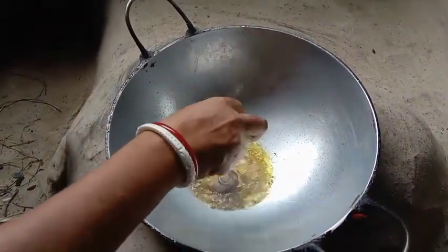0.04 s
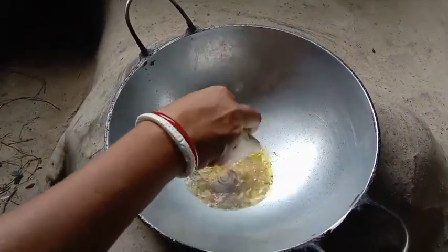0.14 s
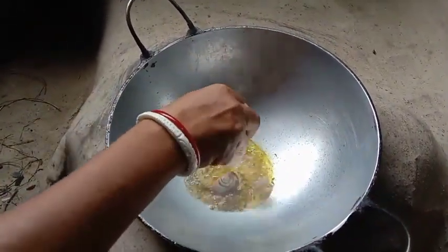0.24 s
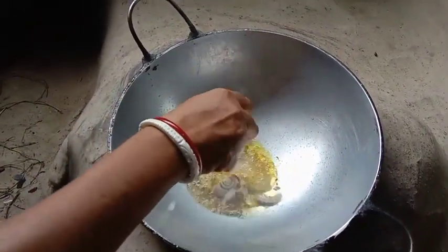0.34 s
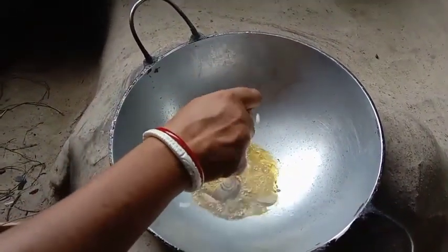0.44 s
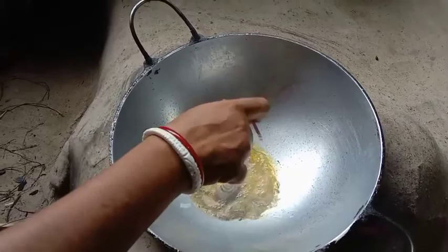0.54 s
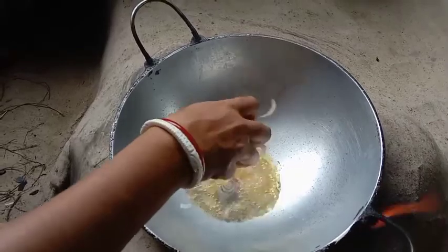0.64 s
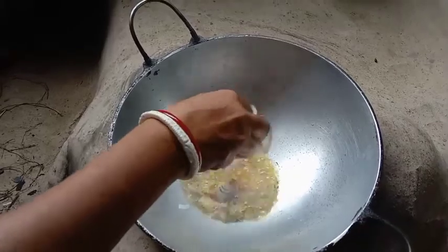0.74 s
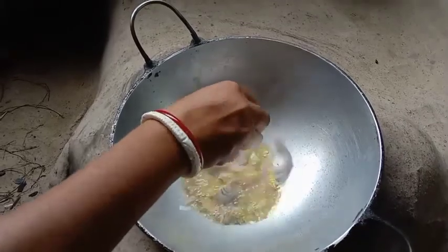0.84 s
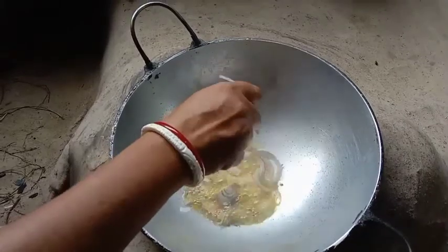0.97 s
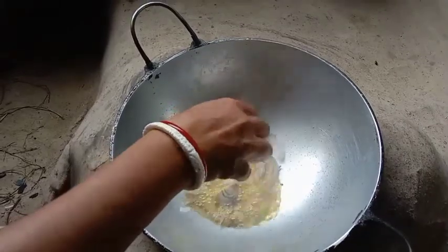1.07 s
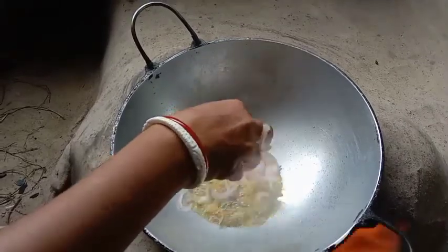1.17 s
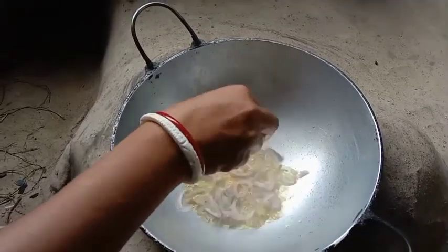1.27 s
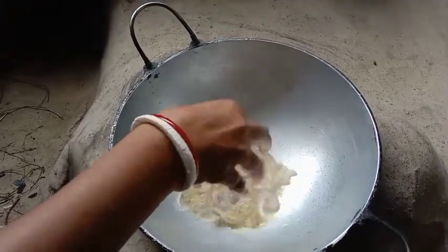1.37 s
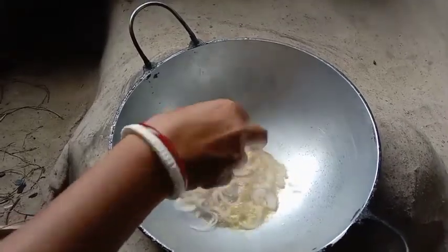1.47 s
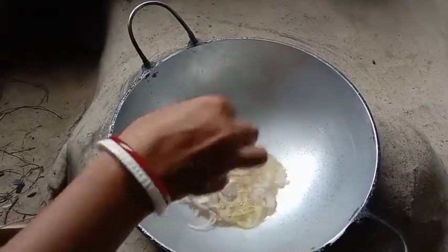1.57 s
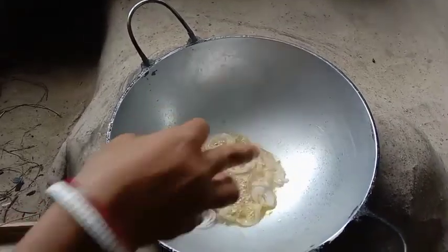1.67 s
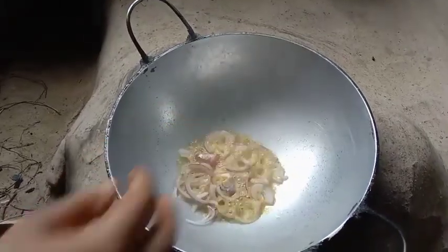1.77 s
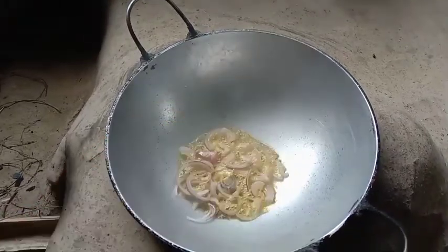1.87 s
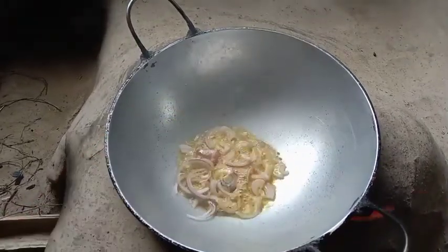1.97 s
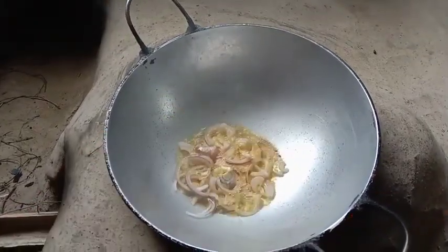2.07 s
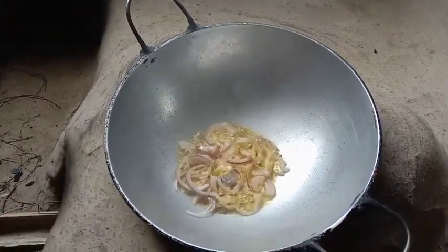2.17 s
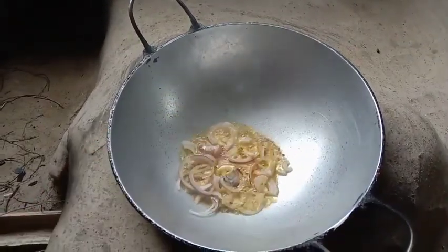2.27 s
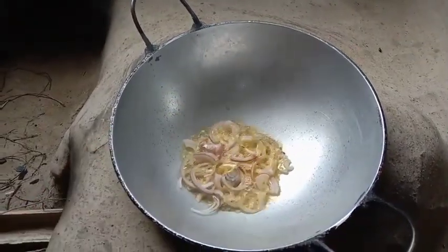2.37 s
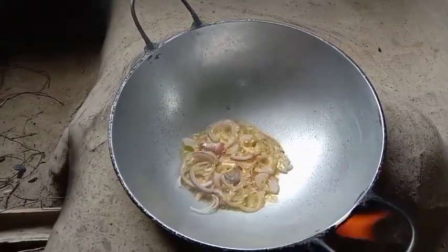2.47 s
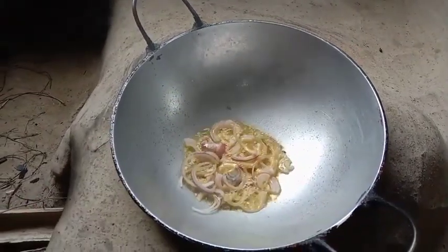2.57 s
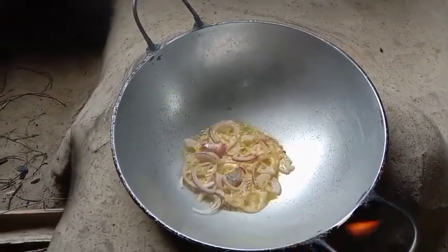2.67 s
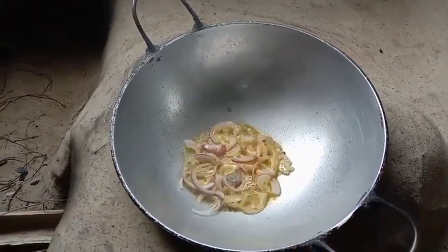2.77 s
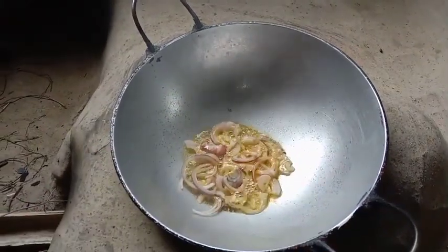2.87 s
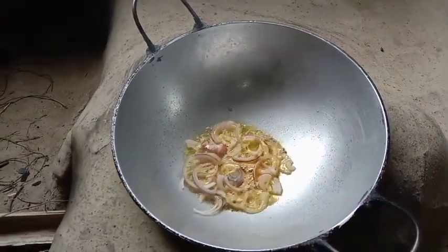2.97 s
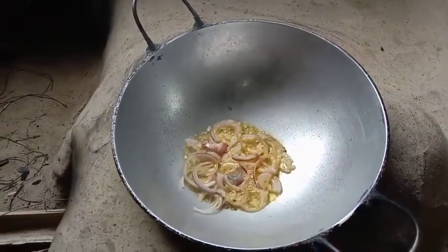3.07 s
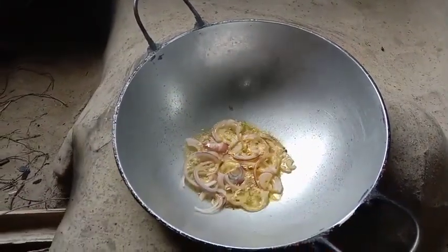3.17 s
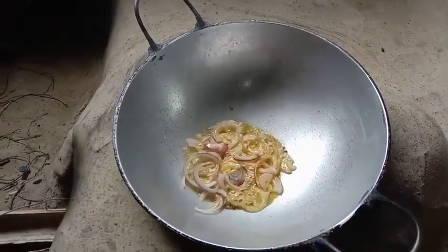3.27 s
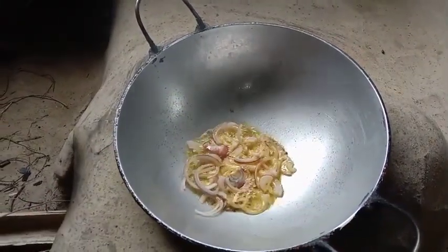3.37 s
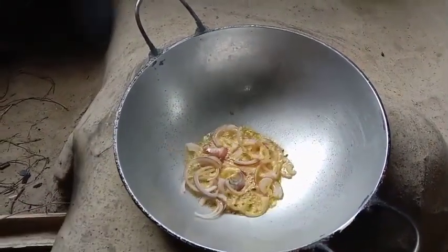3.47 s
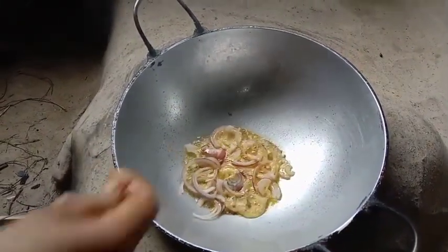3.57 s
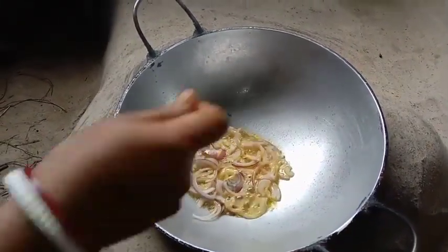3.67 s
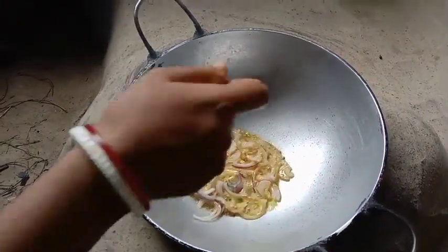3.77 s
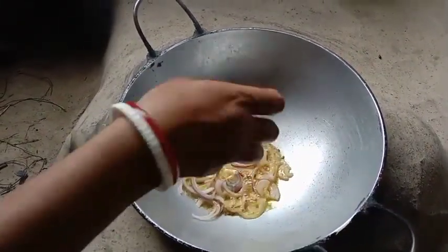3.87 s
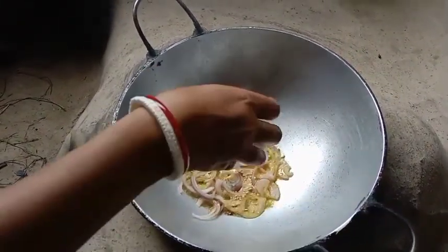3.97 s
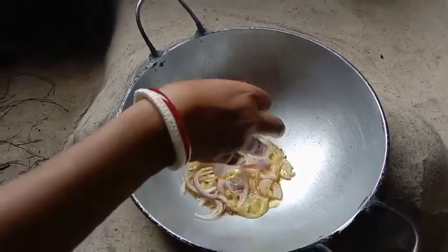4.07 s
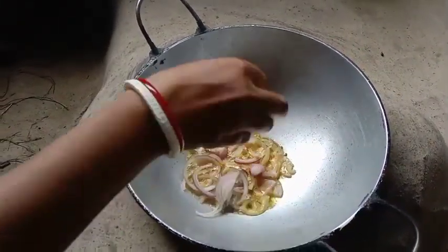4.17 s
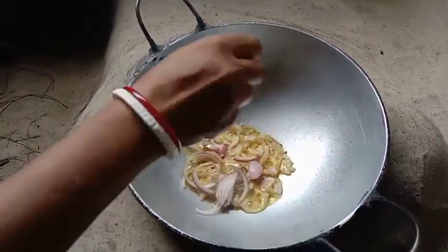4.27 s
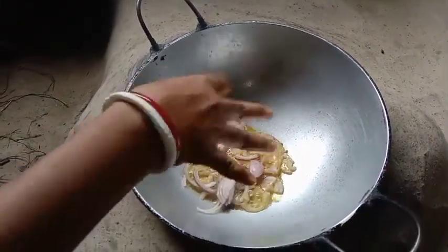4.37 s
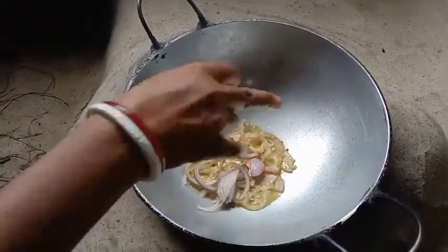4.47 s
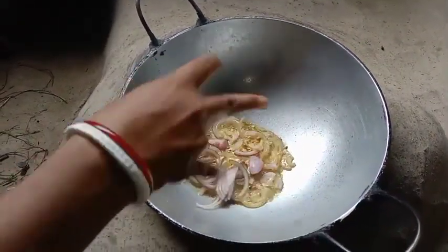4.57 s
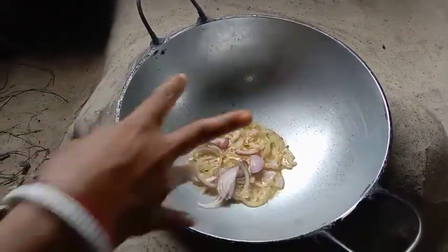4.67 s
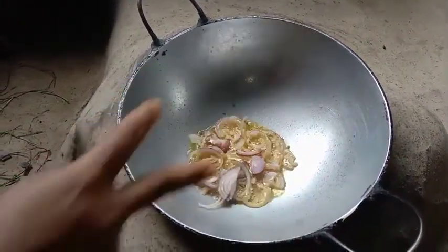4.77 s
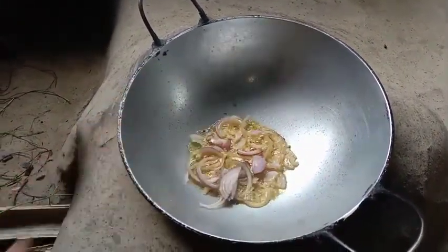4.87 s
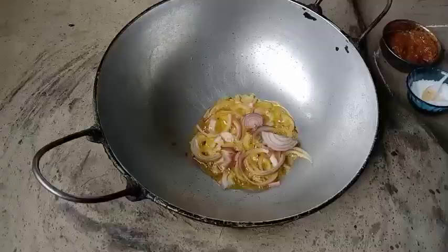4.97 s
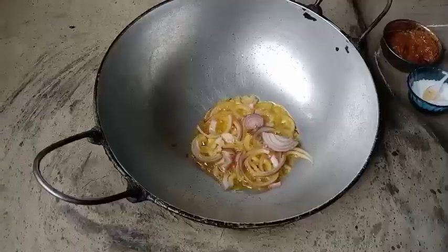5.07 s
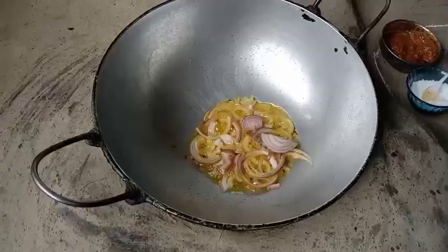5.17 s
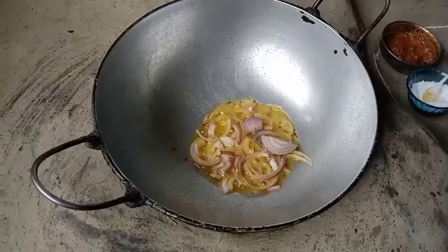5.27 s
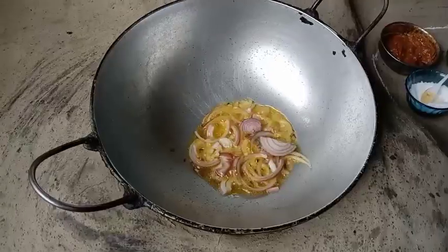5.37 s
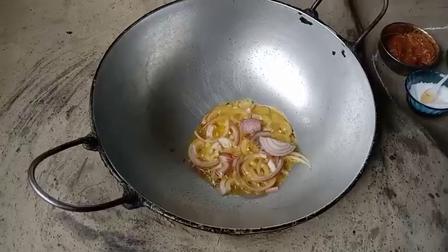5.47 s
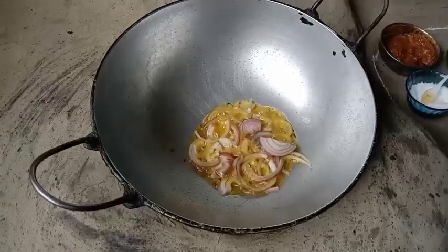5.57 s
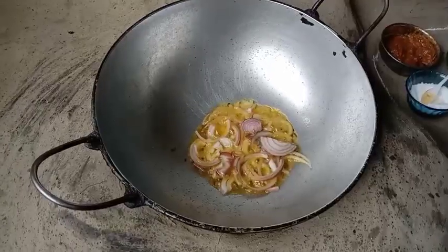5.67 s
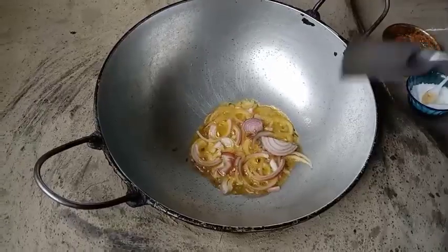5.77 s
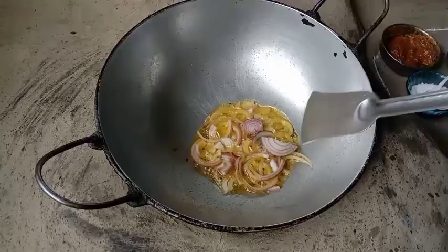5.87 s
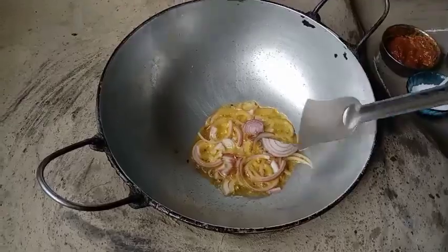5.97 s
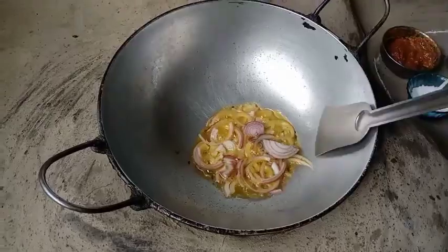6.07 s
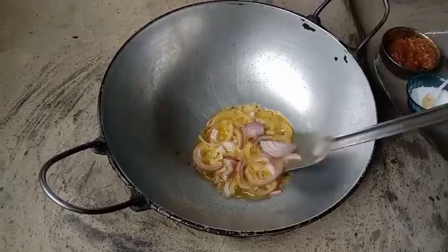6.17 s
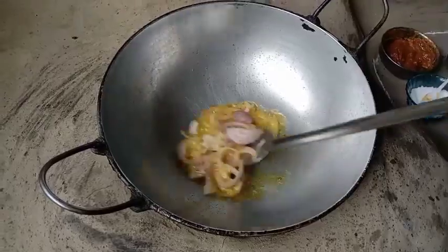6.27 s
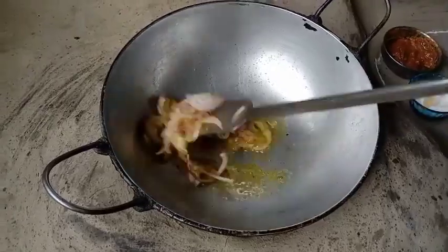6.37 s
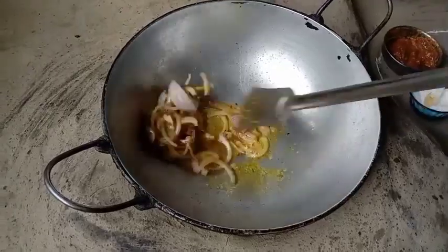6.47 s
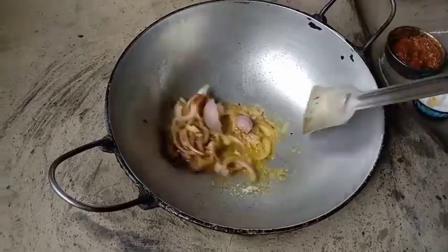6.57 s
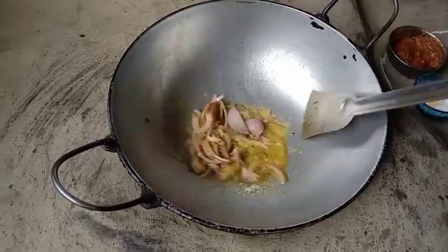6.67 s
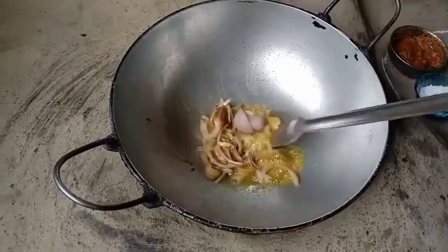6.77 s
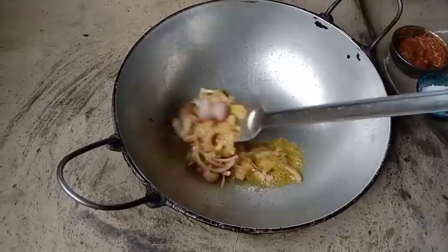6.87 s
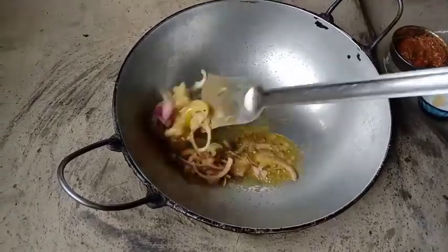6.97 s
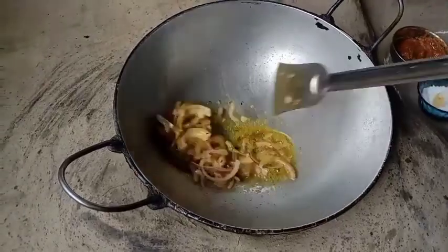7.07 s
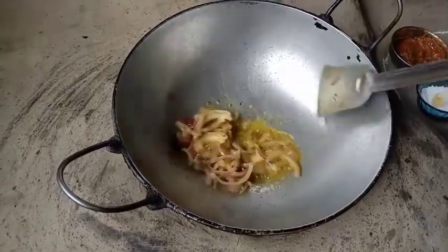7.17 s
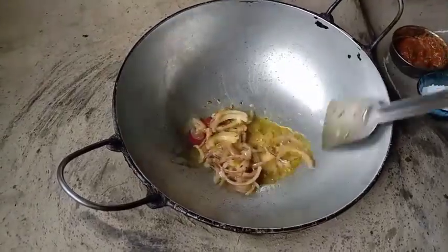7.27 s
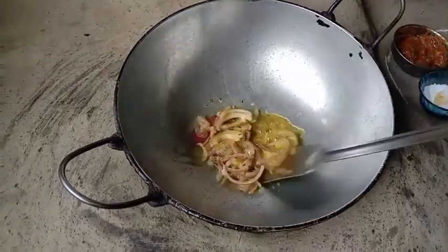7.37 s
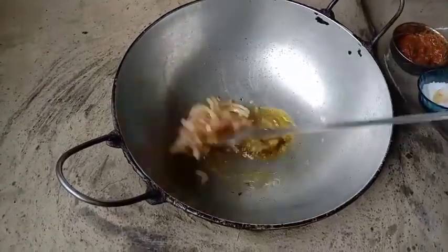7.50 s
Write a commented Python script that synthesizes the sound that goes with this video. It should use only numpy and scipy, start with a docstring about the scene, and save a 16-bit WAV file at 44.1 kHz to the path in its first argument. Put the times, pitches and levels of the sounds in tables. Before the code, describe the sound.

Wet onion slices sizzle and spit in hot oil in a metal pan, fade to a quiet simmer, then flare as a steel spatula stirs.

```python
"""Sliced onions sizzle in hot oil in a round metal pan over a wood fire, heard from close above.
Random bubble clicks ring a bank of resonances; loud pops, dry snaps, knocks and plops stand out.
The pan bowl colours the frying; near 4.9 s the listening place changes: duller, with a low stove hum.
Near 6 s a steel spatula lands, slides and rings the pan, and the sizzle flares up again.
Beneath, filtered noise and short low hums make the flutter, rumble and puffs of the fire."""
import sys
import numpy as np
from scipy import signal
from scipy.fft import rfft, irfft
from scipy.io import wavfile

SR = 44100
rng = np.random.default_rng(int(sys.argv[2]) if len(sys.argv) > 2 else 0)


def inscribe(sig):
    """Save sig as 16-bit PCM at rate SR to the path in sys.argv[1].

    A 1-D sig is mono; a 2-D sig holds one channel per row.
    Samples are clipped to [-1, 1] before scaling.
    """
    pcm = np.round(np.clip(np.atleast_2d(sig).T, -1, 1) * 32767)
    wavfile.write(sys.argv[1], SR, pcm.astype(np.int16))


N = 332423


def from_db(db):
    """Amplitude ratio of a level in dB."""
    return 10 ** (np.asarray(db) / 20)


def rms_one(x):
    """Scale to RMS 1."""
    return x / np.sqrt(np.mean(x ** 2) + 1e-20)


def seconds(length_s):
    """Time axis [s] of a short sound."""
    return np.arange(int(length_s * SR)) / SR


def in_time(rows):
    """Columns of a table interpolated over time; the first column is the time."""
    s, *columns = np.transpose(rows)
    return [np.interp(np.arange(N) / SR, s, c) for c in columns]


def ramp(start_s, length_s):
    """Linear rise from 0 to 1."""
    return np.clip((np.arange(N) / SR - start_s) / length_s, 0, 1)


def swell(full_s, db, rise_db_per_s, hold_s, fall_db_per_s):
    """Gain that rises, holds and falls along straight lines in dB."""
    t = np.arange(N) / SR - full_s
    rise_db = rise_db_per_s * np.minimum(t, 0)
    fall_db = fall_db_per_s * np.maximum(t - hold_s, 0)
    return from_db(np.maximum(db + rise_db - fall_db, -200))


def add_at(out, s, sound):
    """Mix a sound in at s seconds."""
    at = round(s * SR)
    out[at:at + len(sound)] += sound


def high_pass(x, hz, order):
    """Butterworth high-pass."""
    return signal.sosfilt(signal.butter(order, hz, "high", fs=SR, output="sos"), x)


def drift(rate_hz):
    """Slow random wander, spread 1: noise through a double pole at a tenth of the sample rate."""
    r = np.exp(-20 * np.pi * rate_hz / SR)
    noise = rng.standard_normal(N // 10 + 4002)
    slow = rms_one(signal.lfilter([1], [1, -2 * r, r * r], noise)[4000:])
    return np.interp(np.arange(N) / 10, np.arange(len(slow)), slow)


def resonate(x, hz, width_hz):
    """Two-pole resonance with gain 1 on top."""
    r = np.exp(-np.pi * width_hz / SR)
    gain = (1 - r * r) / 2
    return signal.lfilter([gain, 0, -gain], [1, -2 * r * np.cos(2 * np.pi * hz / SR), r * r], x + 1e-18)


def ring(clicks, hz, t60_s):
    """A unit click sets a decaying sine of height 1 ringing."""
    r, w = from_db(-60 / (t60_s * SR)), 2 * np.pi * hz / SR
    return signal.lfilter([0, np.sin(w)], [1, -2 * r * np.cos(w), r * r], clicks + 1e-18)


def colour(x, points, size=8192):
    """Causal minimum-phase filter through (frequency [Hz], gain [dB]) points, via the cepstrum."""
    hz, db = np.transpose(points)
    grid_hz = np.maximum(np.arange(size // 2 + 1) * SR / size, 1)
    gain_db = np.interp(np.log(grid_hz), np.log(hz), db)
    cepstrum = irfft(np.log(from_db(gain_db)))
    cepstrum[1:size // 2] *= 2
    cepstrum[size // 2 + 1:] = 0
    return signal.fftconvolve(x, irfft(np.exp(rfft(cepstrum))))[:N]


def bursts(per_s, spread_db):
    """Random clicks of either sign, many small and a few large."""
    sizes = from_db(spread_db * np.minimum(rng.exponential(1, N), 6)) * rng.choice([-1, 1], N)
    return sizes * (rng.random(N) < per_s / SR)


# puffs of flame: (time [s], level [dB], hum frequency [Hz])
FLAME_PUFFS = [(0.06, -49, 226), (0.628, -42, 223), (1.012, -33, 210), (1.074, -42, 222), (1.219, -44, 154),
               (1.983, -46, 175), (2.081, -35, 158), (2.364, -35, 223), (2.523, -44, 167), (2.74, -41, 163),
               (3.031, -41, 166), (3.177, -44, 228), (3.58, -41, 155), (3.73, -46, 162), (3.881, -42, 166),
               (4.039, -35, 163), (4.12, -32, 155), (4.318, -40.5, 215), (4.829, -44, 156),
               (5.004, -50, 250), (5.639, -43, 238), (6.024, -32, 247), (6.12, -35.5, 239),
               (6.183, -37, 250), (6.379, -46, 242), (6.472, -38, 236), (6.596, -38, 248),
               (6.934, -35, 244), (7.234, -33, 242), (7.297, -37, 242)]
PUFF_T60_S = 0.11


def puffs():
    """Each puff swells softly and dies as a short low hum with rough edges."""
    out, t = np.zeros(N + SR), seconds(.2)
    rough = rng.standard_normal((len(FLAME_PUFFS), len(t)))
    for (s, db, hz), noise in zip(FLAME_PUFFS, rough):
        edges = rms_one(resonate(resonate(noise, hz, 130.0), hz, 150.0))
        hum = np.sin(2 * np.pi * hz * t) + 0.32 * edges
        envelope = from_db(db - 60 * t / PUFF_T60_S) * (1 - np.exp(-t / 0.015))
        add_at(out, s, envelope * hum)
    return out[:N]


# flame noise spectrum: (frequency [Hz], gain [dB])
FLAME_COLOUR = [(60, -19), (110, 0), (165, 1), (260, -2.5), (380, -7.5), (600, -50)]
# flame flutter: (time [s], level [dB])
FLAME_FLUTTER = [(0.0, -67), (0.4, -71), (1.07, -59), (1.55, -66.5), (4.01, -62), (4.45, -68.5),
                 (6.71, -71), (7.53, -70)]
RUMBLE_DB, FLAME_WAVER_DB = -72, 4.5
STOVE_HZ, STOVE_WIDTH_HZ, STOVE_DB = 242, 27, -66   # hollow of the stove
CHANGE_S, CHANGE_LENGTH_S = 4.92, 0.012   # tone turns duller, stove hum enters


def fire():
    """Lumpy low flutter of the flames over a deep rumble; the stove's hollow hums on one broad note."""
    flutter_db = in_time(FLAME_FLUTTER)[0] + FLAME_WAVER_DB * drift(4.4)
    flutter = from_db(flutter_db) * rms_one(colour(rng.standard_normal(N), FLAME_COLOUR))
    deep = rms_one(resonate(resonate(rng.standard_normal(N), 70., 38.0), 68.0, 67.0))
    rumble = from_db(RUMBLE_DB + FLAME_WAVER_DB * drift(2.3)) * deep
    hum = resonate(resonate(rng.standard_normal(N), STOVE_HZ, STOVE_WIDTH_HZ), STOVE_HZ, 2 * STOVE_WIDTH_HZ)
    stove = from_db(STOVE_DB + 1.4 * drift(16.0)) * rms_one(hum)
    return flutter + rumble + puffs() + ramp(CHANGE_S, CHANGE_LENGTH_S) * stove


# bowl tone at first, then duller and darker in the treble, heard from a changed microphone position,
# then brighter again, as the sizzle flares up: (frequency [Hz], gain [dB])
FIRST_COLOUR = [(250, -19.5), (420, -32.5), (490, -14.5), (1040, -15), (1520, -11), (2100, -7), (2700, -7),
                (3300, -1), (3900, 0.5), (5750, 0.5), (6250, -8.5), (6750, -1), (7500, -1.5), (8150, -7),
                (10600, -1.5), (13400, -12), (14800, 0.5)]
DULLER_COLOUR = [(250, -44), (450, -21.5), (1070, -19), (1600, -11), (2200, -13), (2900, -8.5),
                 (3600, -5.5), (5400, -8.5), (6200, -11.5), (7000, -5), (8200, -18), (9600, -8.5),
                 (12800, -28), (15100, -14)]
BRIGHTER_COLOUR = [(250, -16.5), (330, -28.5), (600, -16), (990, -20), (1520, -12), (2300, -10.5),
                   (3500, -1), (5500, -1.5), (6300, -4.5), (7200, -1), (8340, -7), (10000, 0.5),
                   (13000, -11.5), (14900, 2)]
BRIGHTEN_S, BRIGHTEN_LENGTH_S = 6.2, 0.075
BOWL_GAIN_DB = 6.0   # overall gain of the sounds coloured by the bowl


def bowl(x):
    """The bowl throws each sound back as a short diffuse tail and colours it in three crossfaded stages."""
    t = seconds(.08)
    tail = rng.standard_normal(len(t)) * from_db(-35 - 60 * t / .06) * (t > .0006)
    tail[0] = 1   # direct sound
    x = from_db(BOWL_GAIN_DB) * signal.fftconvolve(x, tail)[:N]
    changed, brightened = ramp(CHANGE_S, CHANGE_LENGTH_S), ramp(BRIGHTEN_S, BRIGHTEN_LENGTH_S)
    first = colour(x * (1 - changed), FIRST_COLOUR)
    duller = colour(x * (changed - brightened), DULLER_COLOUR)
    return first + duller + colour(x * brightened, BRIGHTER_COLOUR)


# modes of blade and pan: (frequency [Hz], relative level [dB], t60 [s])
STEEL_MODES = [(598, -12, .05), (1249, -25, .2), (1367, -22, .3), (1660, -30, .1), (1949, -25, .3),
               (2400, -26, .05), (2760, -16, .03), (3085, -23, .2), (3260, -9, .05), (3480, -4, .03),
               (3557, 0, .035), (3682, -12, .06), (4400, -8, .035), (4786, -14, .06), (5070, -6, .03),
               (5249, -12, .06), (5340, -10, .05), (5600, -12, .05), (5810, -10, .05), (5994, -4, .04),
               (6325, 0, .04), (6700, -7, .04), (6845, -6, .045), (7000, -8, .045), (7200, -7, .045),
               (7560, -13, .04), (7650, -12, .04), (9050, -10, .025), (9372, -12, .03), (10930, -9, .03)]
# soft spatula touches: (time [s], drive level [dB])
SOFT_TOUCHES = [(6.185, -33), (6.599, -21.5), (6.791, -23.5), (7.251, -29)]
# gain swells: (full at [s], level [dB], rise [dB/s], hold [s], fall [dB/s])
CONTACT_SWELLS = [(6.026, -40.5, 6000, .008, 900), (6.06, -64, 900, .08, 250)]   # rattle that rings the steel
GRIT_SWELLS = [(6.0205, -15, 30000, .003, 3000), (6.026, -15, 5000, .007, 780),
               (6.033, -10.5, 30000, .0006, 15000)]   # bright crunch of the landing
THUD_SWELLS = [(6.0205, -32, 12000, .004, 500), (6.188, -42, 600, .002, 600)]
SQUEAL_SWELL = (6.135, -32, 420, .07, 380)   # the flexing blade
# blade resonances sinking as it slides: (start [Hz], end [Hz], width [Hz], relative level [dB])
BLADE_SLIDE = [(1390, 1250, 20, -5), (1880, 1680, 25, -12), (2440, 2130, 18, -8), (3100, 2750, 70, -13),
               (4150, 3950, 90, -8), (5000, 4700, 150, -10), (6000, 5500, 170, -9), (7100, 6800, 170, -11)]
SLIDE_START_S, SLIDE_END_S = 6.12, 6.22
SCRAPE_TOP_HZ, GRIT_LOW_HZ = 7500, 2600


def spatula():
    """The blade lands unevenly and slides on: a rattle of contacts drives the steel modes; touches follow."""
    t = np.arange(N) / SR
    contact, grit, thump = (sum(swell(*row) for row in rows)
                            for rows in (CONTACT_SWELLS, GRIT_SWELLS, THUD_SWELLS))
    rattle = rms_one(bursts(9000., spread_db=3.0))
    touches = np.zeros(N)
    for s, db in SOFT_TOUCHES:
        touches[round(s * SR)] = from_db(db)
    touches = signal.lfilter([.3], [1, -.7], touches)   # a soft contact is a dull click
    drive = contact * rattle + touches
    steel = sum(from_db(db) * ring(drive, hz, t60_s) * (-1) ** k
                for k, (hz, db, t60_s) in enumerate(STEEL_MODES))
    rasp = swell(6.14, -27.5, 140, .062, 450) * rattle
    scrape = signal.sosfilt(signal.butter(1, SCRAPE_TOP_HZ, fs=SR, output="sos"), rasp)
    crunch = high_pass(grit * rattle, GRIT_LOW_HZ, order=2)
    thud = thump * rms_one(resonate(rng.standard_normal(N), 600.0, 250.))
    slide = 0   # noise bands around gliding centres
    for start_hz, end_hz, width_hz, db in BLADE_SLIDE:
        centre_hz = np.interp(t, [SLIDE_START_S, SLIDE_END_S], [start_hz, end_hz])
        slide = slide + from_db(db) * drift(width_hz) * np.sin(2 * np.pi * np.cumsum(centre_hz) / SR)
    out = steel + thud + swell(*SQUEAL_SWELL) * slide + colour(crunch + scrape, BRIGHTER_COLOUR)
    return high_pass(out, 350., order=3)   # the pan is too small to radiate bass


# large steam pockets escaping under the slices: (time [s], level [dB], frequency [Hz])
STEAM_PLOPS = [(0.082, -35, 1100), (0.99, -32.5, 564), (1.226, -34, 500), (1.364, -46, 894),
               (1.455, -38.5, 890), (1.812, -33, 850), (1.944, -35, 900), (2.141, -31.5, 870),
               (2.321, -36, 830), (2.512, -34, 830), (3.03, -29.5, 710)]


def plops():
    """A big bubble rings a few cycles, rising in pitch as it opens."""
    out, t = np.zeros(N + SR), seconds(.05)
    for s, db, hz in STEAM_PLOPS:
        tone = np.sin(2 * np.pi * hz * t * (0.88 + 42.5 * t))
        add_at(out, s, from_db(db - 1.9 * t * hz) * tone)
    return high_pass(out[:N], 350., order=3)


# heavy bursts that knock the pan: (time [s], level [dB], air ring relative to it [dB])
PAN_KNOCKS = [(1.811, -13.5, -15), (3.030, -26, -2.5), (3.054, -34, -2), (3.257, -32, -6),
              (3.277, -32.5, -1), (3.348, -30, -11), (3.501, -28, -10), (3.857, -35, -2),
              (3.9455, -25, -4.5), (5.124, -36, -17), (5.5945, -24, -7), (6.181, -30, -3), (6.751, -23, -5),
              (7.2512, -21.5, -1)]
KNOCK_HZ, KNOCK_RING_T60_S = 1980, 0.052
PAN_LOW_HZ = 420   # the pan radiates little below this


def knocks():
    """A blunt, quickly damped pressure cycle, then the air in the bowl rings out."""
    out, t = np.zeros(N + SR), seconds(.1)
    blow = 1.3 * np.sin(2 * np.pi * KNOCK_HZ * t) * from_db(-8. * t * KNOCK_HZ)
    air = np.sin(2 * np.pi * AIR_MODES[0][0] * t) * from_db(-60 * t / KNOCK_RING_T60_S)
    for s, db, ring_db in PAN_KNOCKS:
        add_at(out, s, from_db(db) * (blow + from_db(ring_db) * air))
    return high_pass(out[:N] + 1e-18, PAN_LOW_HZ, order=4)


# dry snaps of spitting oil: (time [s], level before the bowl [dB])
OIL_SNAPS = [(0.0388, -14), (0.0687, -14), (0.132, -13), (0.4479, -25), (0.731, -3), (0.8604, -15),
             (1.1528, -10), (1.1954, -14), (1.5, -5), (1.701, -7), (1.7663, -10), (2.2069, -15),
             (2.394, -9), (2.444, -5), (2.4867, -12), (2.5706, -25), (2.6454, -18), (2.6863, -23),
             (2.7816, -11), (2.818, -5), (2.9422, -14), (3.0071, -17), (3.1033, -24), (3.1278, -16),
             (3.1916, -17), (3.258, -19), (3.3064, -25), (3.4117, -13), (3.5184, -29), (3.5638, -15),
             (3.8048, -18), (3.8581, -14), (3.9458, -13), (4.2093, -26), (4.2273, -30), (4.3046, -19),
             (4.346, -14), (4.3765, -23), (4.4927, -32), (4.8015, -21), (4.8549, -22), (5.3971, -28),
             (5.895, -32), (5.9604, -33), (6.2517, -26), (6.2926, -20), (6.33, -10), (6.347, -12),
             (6.4418, -27), (6.4712, -22), (6.5507, -9), (6.7935, -7), (6.8664, -19), (6.8758, -19),
             (7.0084, -10), (7.1784, -8), (7.229, -15), (7.401, -16), (7.4164, -27)]


def snaps():
    """Each snap is a sharp two-sided click with a very short treble hiss behind it and no ring."""
    out, t = np.zeros(N + SR), seconds(0.011)
    hisses = rng.standard_normal((len(OIL_SNAPS), len(t)))
    for (s, db), noise in zip(OIL_SNAPS, hisses):
        sound = 0.25 * np.gradient(noise) * from_db(-60 * t / 0.014)
        sound[:3] += [.7, -1, .4]
        add_at(out, s, from_db(db) * sound)
    return out[:N]


# loud bursts: (time [s], level before the bowl [dB], bubble frequency [Hz], sputter relative to it [dB])
LOUD_POPS = [(0.039, -13.5, 4800, -7.5), (0.096, -16, 6600, -12), (0.277, -23.5, 3830, -0.5),
             (0.31, -17, 3700, -8), (0.364, -22, 5370, -5), (0.611, -10, 3620, -17),
             (0.659, -13, 4930, -14), (0.733, -14, 3980, -24), (0.774, -8.5, 3450, -12),
             (0.81, -15, 4900, -24), (0.863, -16, 3800, -14), (0.875, -17, 5130, -11),
             (0.887, -20, 4780, -11), (0.934, -9, 3600, -14), (0.999, -8.5, 4640, -22),
             (1.015, -19, 4650, -16), (1.09, -29, 3600, 3), (1.135, -12, 4600, -15),
             (1.196, -5.5, 3550, -41), (1.243, -13.5, 3300, -11.5), (1.281, -7, 7160, -15.5),
             (1.305, -13, 2580, -6), (1.318, -27, 3810, 0), (1.333, -16, 3730, -14),
             (1.497, -13, 6620, -18), (1.557, -11, 3300, -13), (1.695, -20.5, 2500, 0.5),
             (1.811, -11, 3600, -12), (1.92, -18.5, 3900, -7.5), (2.074, -28, 3900, -12),
             (2.103, -18, 3800, -11.5), (2.245, -23, 5500, -24), (2.37, -21, 4900, -10),
             (2.432, -11, 6880, -31), (2.443, -13, 3700, -20), (2.732, -12, 14800, -19),
             (2.78, -22, 3620, -19), (2.812, -21, 5070, -16), (2.847, -13, 3600, -29),
             (2.888, -26, 3900, -17), (3.161, -24, 6050, -6), (3.192, -23, 5700, -16),
             (3.277, -25, 4700, -12.5), (3.348, -23, 3470, -16), (3.41, -2.5, 14600, -28),
             (3.687, -24, 6940, -14), (3.772, -15.5, 4700, -33), (3.839, -30.5, 3970, -3),
             (3.991, -28.5, 4230, -7.5), (4.177, -25, 3960, -24), (4.347, -31, 5450, -15),
             (4.373, -26, 5300, -8), (4.718, -30, 5150, -9), (4.816, -19.5, 5400, -18),
             (4.856, -25, 5130, -23), (4.896, -31, 5440, -7), (4.924, -31, 3430, -7),
             (4.959, -29, 6740, -13), (5.01, -32, 9800, -9), (5.124, -20, 2980, -10.5),
             (5.162, -30, 9000, -7), (5.186, -32, 3870, -8), (5.284, -29, 2800, -11),
             (5.292, -35.5, 1560, 5.5), (5.297, -20, 3930, -15), (5.31, -25, 3630, -11),
             (5.345, -32, 10100, -5), (5.36, -38, 7030, -8), (5.397, -26.5, 7700, -5.5),
             (5.427, -33, 5040, -4), (5.46, -28.5, 7010, -7), (5.475, -36, 3400, -10),
             (5.529, -35, 4650, -8), (5.555, -21, 6900, -14), (5.593, -16, 5240, -14),
             (5.705, -29.5, 4270, -10), (5.717, -28, 4500, -8), (5.728, -28.5, 2900, -7),
             (5.762, -26, 5060, -7.5), (5.82, -37, 7200, -8), (5.843, -30, 8800, -3),
             (5.897, -30, 7000, -13), (5.944, -28, 3020, -4), (5.958, -29, 4500, -5),
             (5.99, -27, 4000, -13), (6.181, -23, 4350, -5), (6.253, -35, 4510, -23), (6.3, -18, 7200, -8),
             (6.3302, -8.5, 4240, -26), (6.389, -15, 3450, -20), (6.421, -10.5, 2770, -20),
             (6.523, -19, 4050, -18), (6.552, -33, 7360, -9), (6.58, -18.5, 6000, -8),
             (6.602, -21, 6900, -5), (6.793, -12, 4470, -20), (6.867, -15, 7310, -17),
             (6.954, -16.5, 3950, -8), (7.181, -14.5, 2980, -14), (7.23, -19, 7700, -8),
             (7.333, -15.5, 4750, -11), (7.463, -26, 3560, -14), (7.501, -1.5, 6950, -25)]
TICK_DB, SPUTTER_T60_S = -4.5, 0.038
# lesser bursts: mean level above the sizzle, pitch range, sputter level
SMALL_POP_DB, SMALL_POP_HZ, SMALL_SPUTTER_DB = 1.5, (3300, 7200), -20


def pops(count=20):
    """A bright tick, the bubble's short ring, then a sputter around the same pitch dying away."""
    out, t = np.zeros(N + SR), seconds(.1)
    when, pitch, size = rng.random((count, 3)).T
    low_hz, high_hz = SMALL_POP_HZ
    small_hz = low_hz * (high_hz / low_hz) ** pitch
    small_db = in_time(SIZZLE_COURSE)[0][(when * N).astype(int)] + SMALL_POP_DB + 3.6 * (size - .5)
    small = [(w * N / SR, db, hz, SMALL_SPUTTER_DB) for w, db, hz in zip(when, small_db, small_hz)]
    spray = rng.standard_normal((count + len(LOUD_POPS), len(t)))
    for (s, db, hz, sputter_db), noise in zip(small + list(LOUD_POPS), spray):
        noise = rms_one(resonate(noise, hz, hz / 9.8)) + 0.049 * noise
        bubble = np.sin(2 * np.pi * hz * t) * from_db(-6. * t * hz)
        sound = bubble + noise * from_db(sputter_db - 60 * t / SPUTTER_T60_S)
        sound[:2] += from_db(TICK_DB) * np.array([1, -.7])
        add_at(out, s, from_db(db) * sound)
    return out[:N]


# brief flare-ups or dips: (time [s], sizzle rise [dB], air mode rise [dB])
FRYING_FLARES = [(0.101, 4.5, 9), (0.29, 2, -18), (0.769, -4, -2), (1.01, 3, -11), (1.328, 2.5, 7),
                 (1.708, 4.5, 5), (1.829, 3, 21), (2.521, -3, 12), (3.04, -2, 16), (3.77, 3, -4),
                 (3.95, -2.5, 16), (4.139, 7, -7), (4.259, 5, 8), (4.85, 1, -3), (5.13, -1.5, 7),
                 (5.299, -1, 14), (5.6, 15.5, 1), (5.711, 4, 9), (5.76, -1.5, -12), (6.19, -6, 9),
                 (6.6, 2, 9), (6.72, 2, 13), (6.758, 0, 19), (6.792, 1, 11), (6.875, 1, 4), (7.24, 5.5, 14),
                 (7.469, -4.5, 11.5)]
FLARE_RISE_S, AIR_RISE_S, FLARE_FALL_S = .004, .014, 0.032


def flares():
    """Level offsets [dB] of sizzle and air mode: each jumps and sinks back, the air more gently."""
    t = np.arange(N) / SR
    sizzle_db, air_db = np.zeros(N), np.zeros(N)
    for s, sizzle_rise_db, air_rise_db in FRYING_FLARES:
        sizzle_db += sizzle_rise_db * np.interp(t - s, [-FLARE_RISE_S, 0, FLARE_FALL_S], [0, 1, 0])
        air_db += air_rise_db * np.interp(t - s, [-AIR_RISE_S, 0, FLARE_FALL_S], [0, 1, 0])
    return sizzle_db, air_db


# frying: (time [s], base level before the bowl [dB], big-bubble tilt below 4 kHz [dB/octave],
# fine-spray tilt above 4 kHz [dB/octave])
SIZZLE_COURSE = [(0.0, -29, -4, -3.5), (0.22, -31.5, 2, -1.5), (0.275, -24.5, -1.5, -3.5),
                 (0.37, -25, -1, -5.5), (0.62, -26.5, -0.5, -4), (0.8, -23, 0, -4), (1.34, -24, 1.75, -2.5),
                 (1.85, -27, 1.15, -1.5), (2.05, -29, 1, -2), (2.95, -32.5, 1.2, -2.5),
                 (3.25, -37.5, 2, -0.5), (4.1, -39.5, 0, -1.5), (4.7, -44, 0.6, 0.2),
                 (4.92, -39.5, 1.4, -4), (4.945, -45, 2, -1), (5.99, -44, 1, 1.9), (6.2, -45.5, 10.5, 0),
                 (6.245, -37.5, 0.5, 2), (6.33, -28.5, -2, -3), (6.7, -29.5, 2, -1.5), (7.49, -27, 1, -4),
                 (7.538, -35.5, 5, -1)]
# air modes of the bowl: (frequency [Hz], width [Hz], relative level [dB])
AIR_MODES = [(1264, 33, 25), (1317, 56, 12), (1240, 33, -25.5)]
# faint pan wall modes that the frying keeps humming: (frequency [Hz], width [Hz], relative level [dB])
WALL_MODES = [(495, 13, -5), (642, 39, -5), (894, 35, 2), (1426, 29, 1), (1770, 40, -2), (1895, 38, 2.5),
              (2030, 22, 4.5), (2090, 16, 3), (2170, 50, -17), (2390, 20, 8), (2580, 31, 8),
              (2670, 20, 10.5)]
UNEVEN_DB, UNEVEN_HZ = .7, 10.5   # the sizzle swells and sinks at random
AIR_DB, AIR_FOLLOWS, AIR_WAVER_DB = -46.5, 0.68, 1.5   # level at -30 dB sizzle; share of its swing
WALL_DB, WALL_WAVER_DB = -17, 4.   # level relative to the sizzle
SPUTTER_FADE_T60_S = 0.12


def frying(count=24):
    """Bubbles of every size ring a few cycles and sputter on; dry ticks and a steam hiss lie between."""
    sizzle_db, big_db, fine_db = in_time(SIZZLE_COURSE)
    flare_db, air_flare_db = flares()
    air_db = AIR_DB + AIR_FOLLOWS * (sizzle_db + 30.0) + air_flare_db + AIR_WAVER_DB * drift(2.6)
    sizzle_db = sizzle_db + flare_db + UNEVEN_DB * drift(UNEVEN_HZ)
    busy = from_db(.3 * (sizzle_db + 25.5))   # a quieter pan has fewer bubbles, each heard apart
    clumps = from_db(.8 * drift(60.) + 1.2 * drift(200.))
    clicks = bursts(7000. * clumps * busy, spread_db=2.0) / np.sqrt(busy)
    dealt = rng.integers(0, count, N)   # size class of each bubble
    steam = from_db(-15.5) * clumps ** 0.24 / busy ** 0.18 * rng.standard_normal(N)
    sputter = rng.standard_normal(N)
    ticks = from_db(6.5) * bursts(1000.0 * clumps * busy, spread_db=3.6) * busy ** 0.3
    # in a quiet pan bubbles of one size come and go in patches
    patches = drift(12) + .7 * drift(70)
    patch_db = np.clip((-22 - sizzle_db) / 7, 1, 3.5)
    fade = from_db(-60 / (SPUTTER_FADE_T60_S * SR)) ** 2
    out = 0
    for k, hz in enumerate(np.geomspace(400, 15500, count)):
        octaves = np.log2(hz / 4000)
        tilt_db = big_db * max(-octaves, 0) + fine_db * max(octaves, 0)
        gain = from_db(tilt_db + patch_db * np.roll(patches, 52001 * k))
        own = clicks * (dealt == k) * np.sqrt(count)
        # each burst leaves dying noise in its band
        after = np.sqrt(signal.lfilter([1 - fade], [1, -fade], own ** 2 + 1e-18))
        own = own + from_db(-15.0) * after * np.roll(sputter, 11 * k) + np.roll(steam, 7 * k)
        tick_gain = (-1) ** k * min(hz / 5300.0, 1) ** 0.84
        out = out + gain * (resonate(own, hz, hz / 5.13) + tick_gain * resonate(ticks, hz, hz / 2.46))
    air = sum(from_db(db) * resonate(0.41 * clicks + steam, hz, width_hz) for hz, width_hz, db in AIR_MODES)
    waver, wall = drift(15.0), 0
    for k, (hz, width_hz, db) in enumerate(WALL_MODES):
        mode = rms_one(resonate(steam + clicks, hz, width_hz))
        wall = wall + from_db(db + WALL_WAVER_DB * np.roll(waver, 30011 * k)) * mode
    humming = from_db(air_db) * rms_one(air) + from_db(sizzle_db + WALL_DB) * rms_one(wall)
    return from_db(sizzle_db) * rms_one(out), humming


def scene():
    """Sizzle, pops and snaps pass through the bowl; the other layers are added directly."""
    sizzle, humming = frying()
    pan = bowl(sizzle + pops() + snaps())
    return (pan + humming + knocks() + plops() + spatula() + fire())[None]


def record(dry):
    """Steep elliptic low-pass at 15.43 kHz."""
    return signal.sosfilt(signal.ellip(10, .5, 60, 15430, fs=SR, output="sos"), dry)


dry = scene()
out = record(dry)
inscribe(out)
```